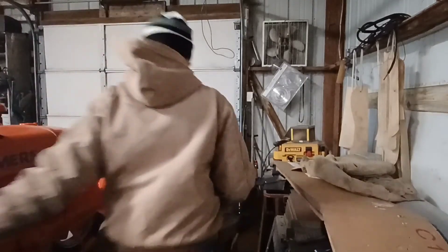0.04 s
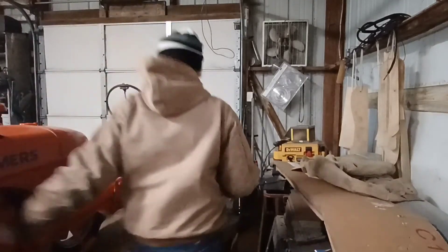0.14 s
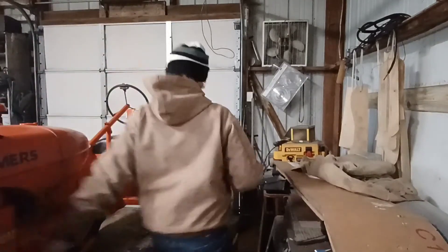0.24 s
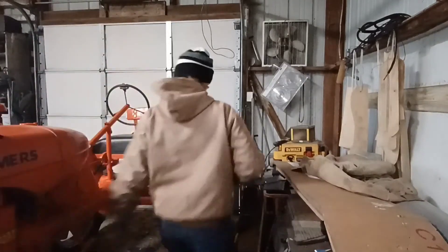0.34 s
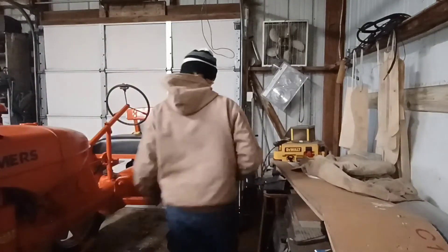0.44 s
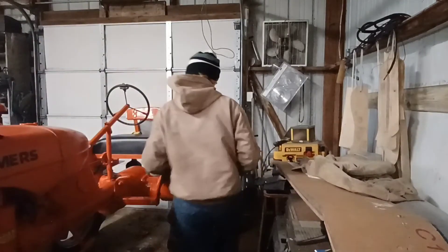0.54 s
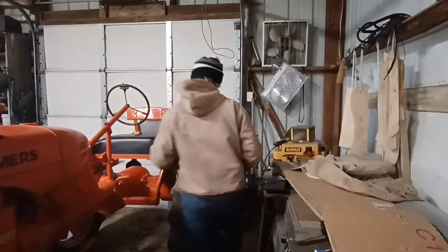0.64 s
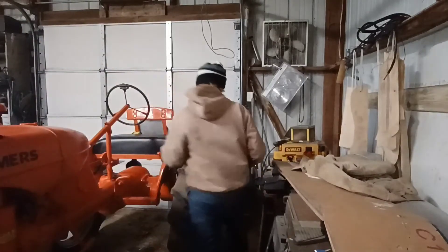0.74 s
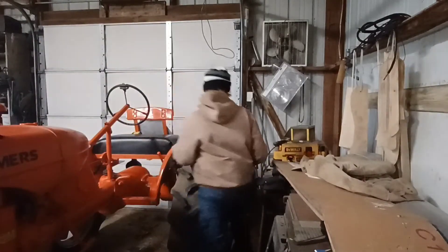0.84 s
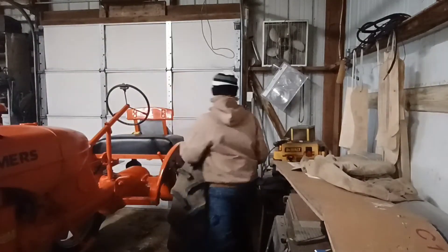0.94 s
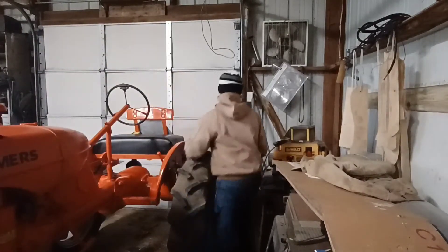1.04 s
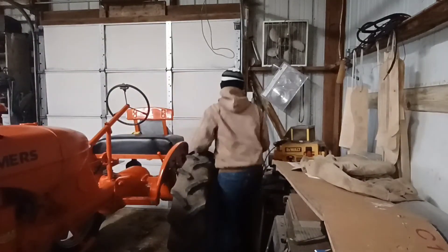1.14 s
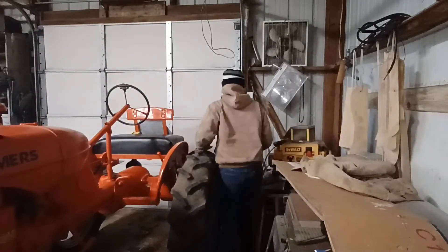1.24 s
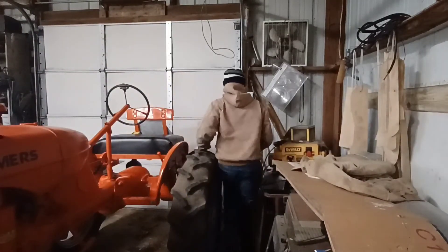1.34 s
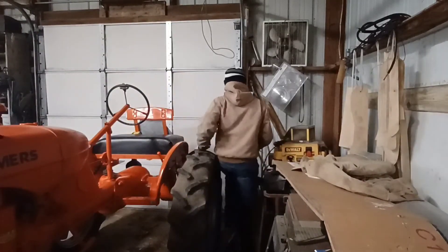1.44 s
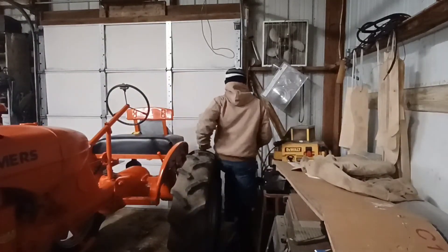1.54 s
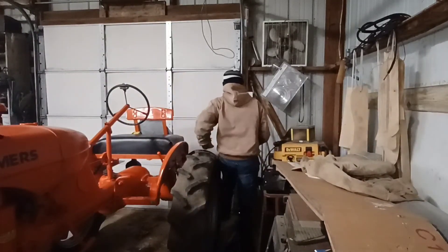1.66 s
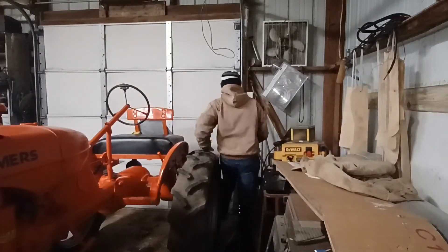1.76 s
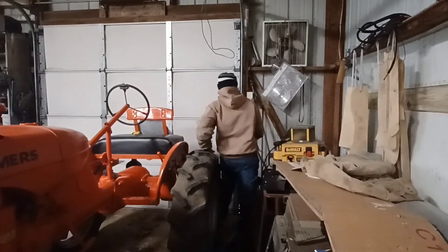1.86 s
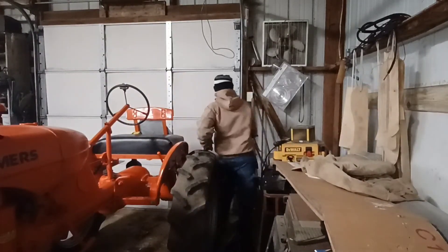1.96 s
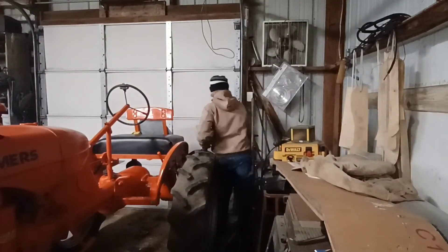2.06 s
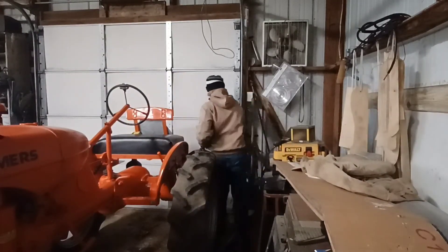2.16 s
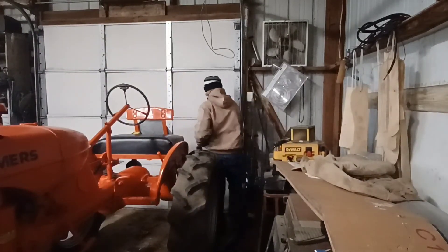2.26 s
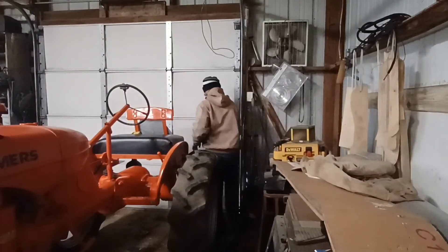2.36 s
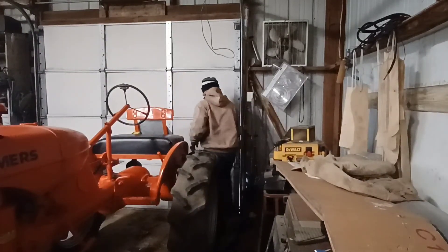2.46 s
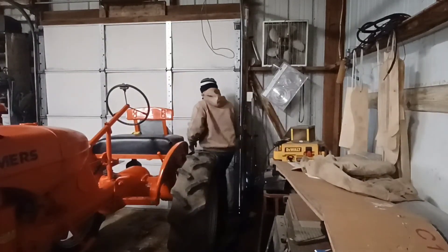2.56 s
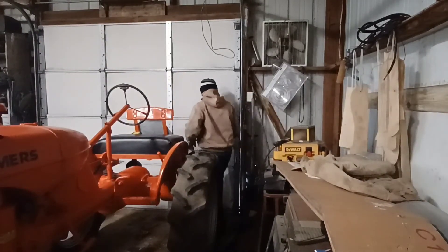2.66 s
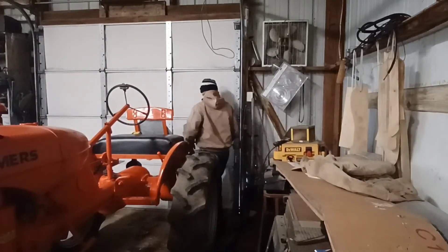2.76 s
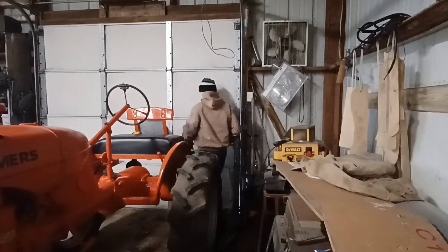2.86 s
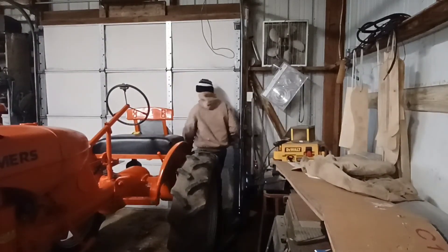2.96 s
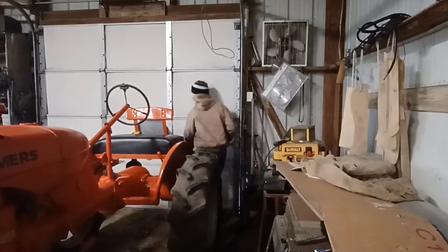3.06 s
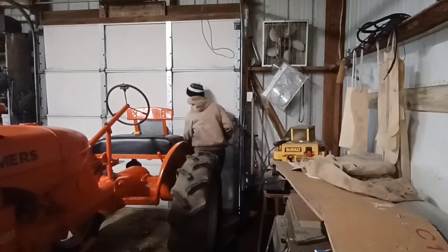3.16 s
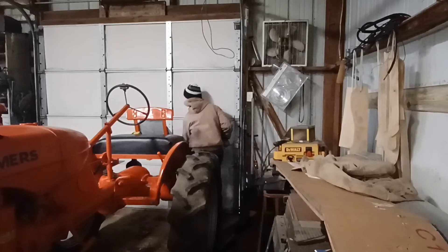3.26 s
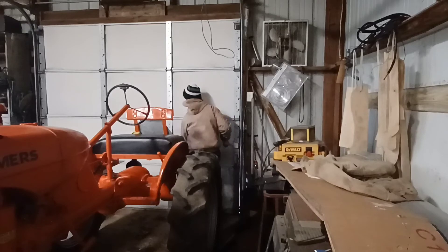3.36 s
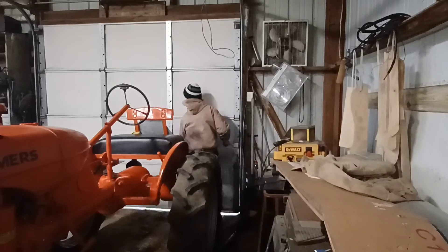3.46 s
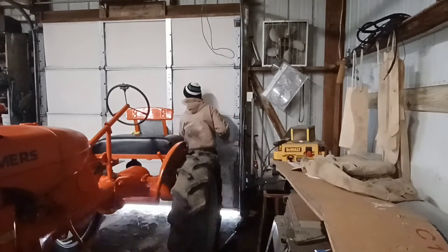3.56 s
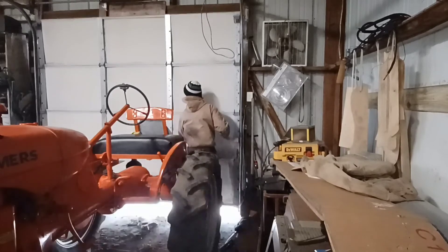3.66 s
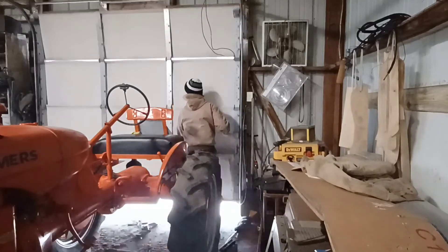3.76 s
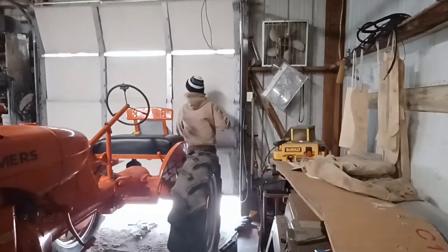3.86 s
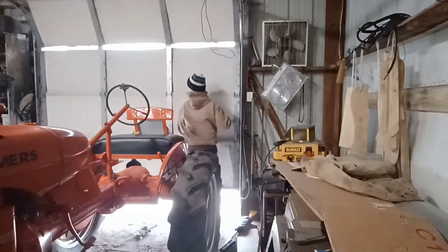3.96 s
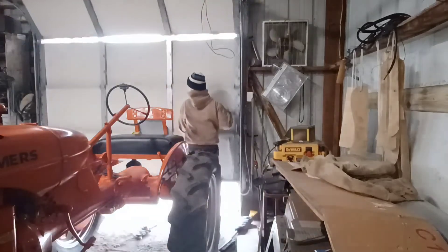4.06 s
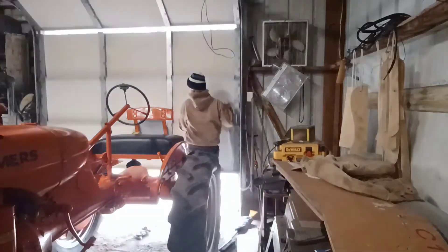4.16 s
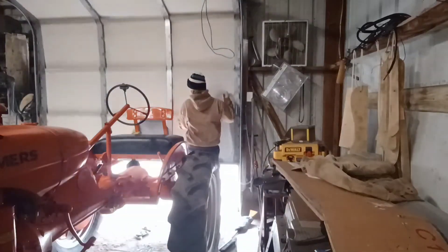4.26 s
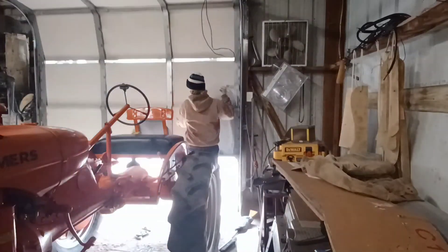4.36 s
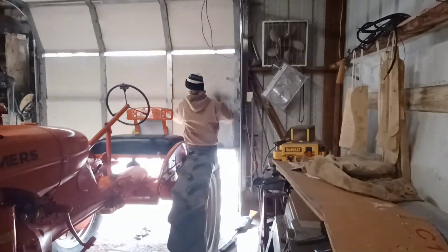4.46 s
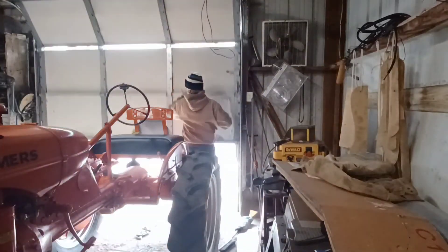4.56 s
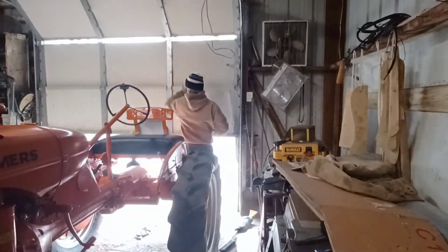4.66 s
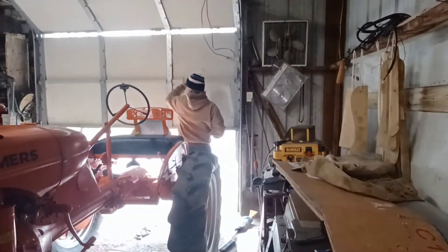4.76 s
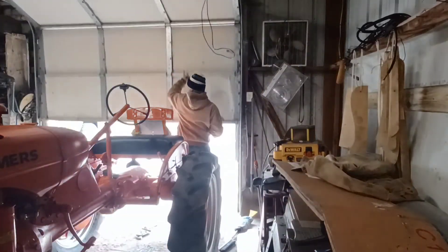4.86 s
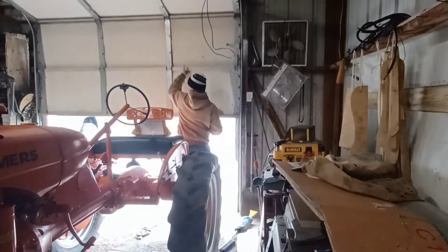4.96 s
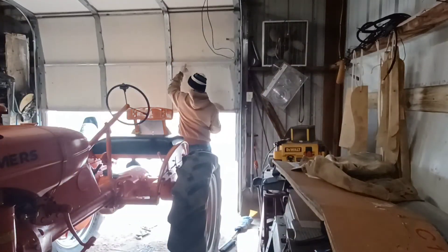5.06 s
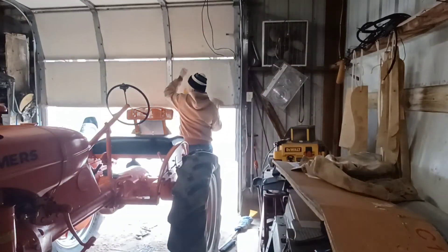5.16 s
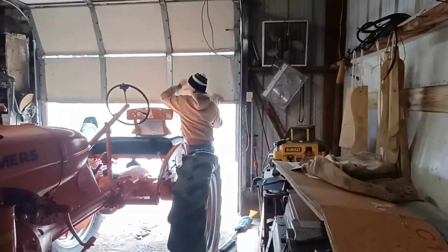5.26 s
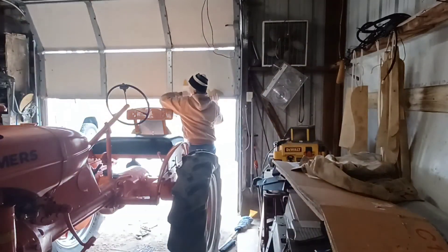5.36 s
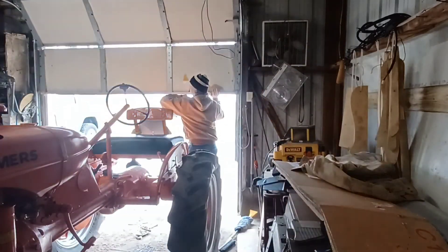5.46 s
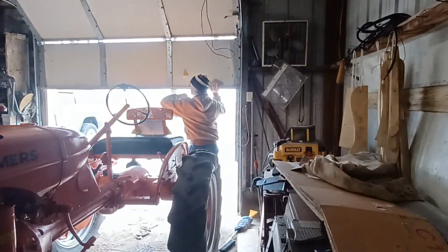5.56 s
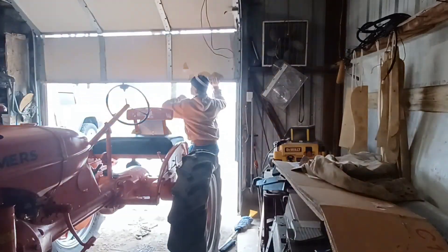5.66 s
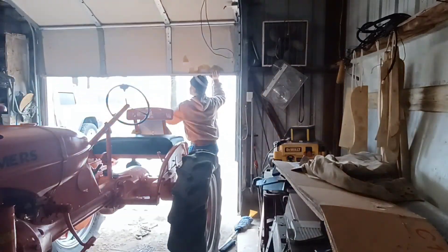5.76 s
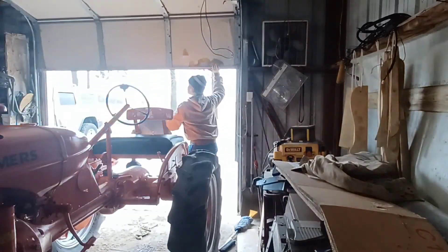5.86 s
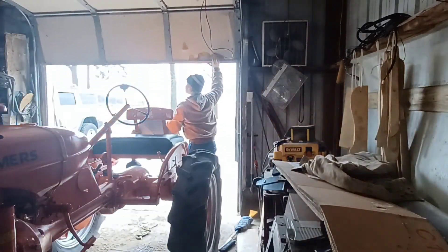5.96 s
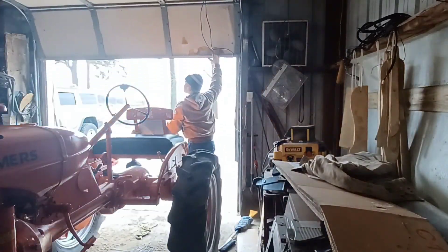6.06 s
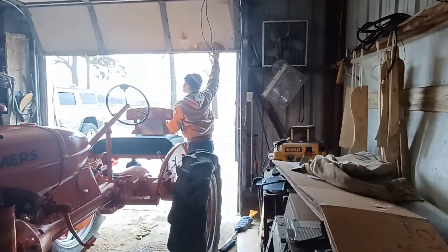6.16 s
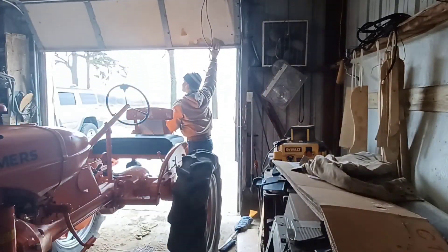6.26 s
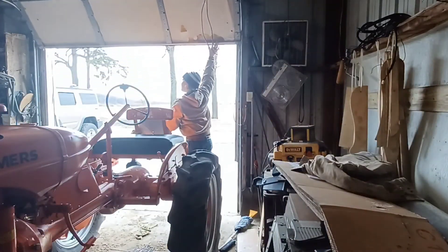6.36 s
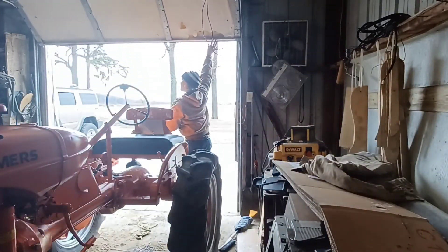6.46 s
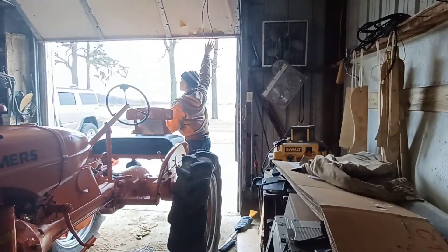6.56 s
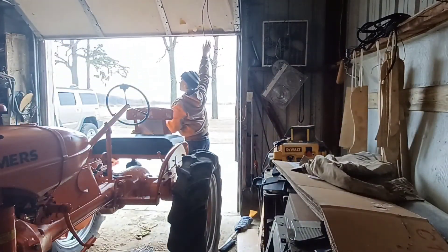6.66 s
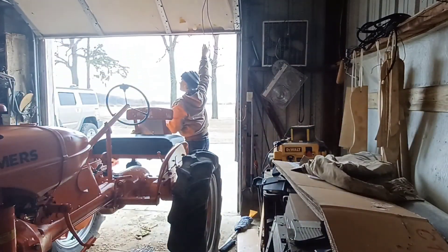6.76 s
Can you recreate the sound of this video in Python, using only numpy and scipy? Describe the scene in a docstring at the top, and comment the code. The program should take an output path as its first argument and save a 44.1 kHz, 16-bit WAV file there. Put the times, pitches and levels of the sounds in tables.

```python
"""A jacket swishes and things get bumped as someone squeezes past a tractor in a steel-clad farm shop.
The latch of an overhead door squeaks as it slides, then slams against its stop. The door is lifted
by hand: its panels drum, its rollers rattle up the tracks and its loose hinges clack and jingle.
A low groan comes near the end. The knocks and rattles echo around the shop, over a faint hush of air."""
import sys
import numpy as np
from scipy import signal
from scipy.fft import rfft, irfft
from scipy.io import wavfile

SR = 44100
rng = np.random.default_rng(int(sys.argv[2]) if len(sys.argv) > 2 else 0)


def master(y):
    """Save y as 16-bit WAV."""
    cut = np.clip(np.atleast_2d(y).T, -1, 1)
    pcm = np.round(cut * 32767)  # scale
    wavfile.write(sys.argv[1], SR, pcm.astype(np.int16))


N = 300321

# The lift, a hard heave and then a push overhead. Speed is given as rattle loudness: time_s, speed_db
DOOR_SPEED = [(3.48, -65), (3.57, -43), (3.7, -45.5), (3.75, -31.5), (3.88, -30.5), (3.97, -28.5),
              (4.09, -28), (4.25, -22.5), (4.38, -25.5), (4.6, -27.5), (4.85, -30.5), (5.0, -27),
              (5.19, -32.5), (5.45, -31), (5.52, -26.5), (5.66, -30), (5.98, -27), (6.2, -33), (6.55, -35),
              (6.81, -44)]
# The panels sway after being leant on and after the slam: start_s, level_db
PANEL_SWAYS = [(2.4, -55), (2.75, -38.5)]
# Steel hits steel at the latch, hinges and track joints: start_s, level_db, hardness_db
STEEL_CLACKS = [(2.627, -36.5, 3.5), (3.004, -53, -4), (3.174, -33.5, 7), (3.392, -45, 3.5),
                (3.561, -45, 0), (3.6637, -33, 2.5), (3.7201, -15.5, -1.5), (3.902, -18.5, -3.5),
                (4.1087, -16.5, 4), (4.4124, -24, 3), (4.765, -27, 9.5), (4.9032, -18, 3), (5.255, -27, 10),
                (5.5004, -19, 4.5), (5.928, -23, 3), (6.3016, -22.5, 0), (6.4822, -18, -2)]
# Dry parts squeak and groan as they slide: peak_s, width_s, pitch_hz, level_db
DRY_SQUEAKS = [(.17, 0.06, 2550, -71), (2.701, 0.013, 1742, -30), (2.714, 0.01, 4820, -25),
               (6.76, 0.1, 492, -33.5)]
# Steps and bumps on the way to the door: start_s, level_db, hardness_db
WALKER_KNOCKS = [(0.009, -50.5, -1), (0.515, -50, 8), (0.803, -48, -2), (0.836, -38, -4.5),
                 (1.004, -16.5, 1), (1.286, -26, -5), (1.465, -38, 9), (2.017, -38, -5.5),
                 (2.227, -40.5, 6), (2.252, -18, -1.5), (2.455, -46, 16)]
# Swishes of the work jacket: peak_s, width_s, level_db, extra_hiss_db
JACKET_SWISHES = [(.01, 0.029, -52, -5), (.2, 0.12, -61, 2.5), (.385, 0.044, -54.5, 3),
                  (.505, 0.024, -51, -5), (.6, 0.062, -62.5, 2), (.95, 0.062, -49, -9),
                  (1.07, 0.042, -42.5, -0.5), (1.35, 0.15, -53, -1), (1.65, 0.089, -71, 7),
                  (1.98, 0.12, -68.5, 7), (2.465, 0.016, -53.5, 6), (3.23, 0.03, -48, 5),
                  (3.33, 0.064, -53, -2)]

# The notes a part rings at, and how long each takes to fade by 60 dB: pitch_hz, level_db, fade_s
PANEL_NOTES = [(101.2, -3, 0.52), (108.7, -1.5, .6), (132.7, -6.5, 0.59), (230.6, -5.5, 0.38),
               (289, -7, 0.12), (353, -8.5, 0.071), (401.5, -12.5, 0.28), (483, -16, 0.54)]   # door panels
STEEL_NOTES = [(1466, 8, 0.3), (1740, -13, 0.17), (3460, -3, 0.15), (4200, -14, 0.2), (4825, -21, .15),
               (6200, -15, .2), (7307, -5, .2), (11400, -15, .15), (11800, -8, .15), (11500, -13, .15),
               (13000, -3, .1), (13300, -11, .1), (14056, -13, .15)]   # track and fittings
TRACK_NOTES = [(2915, 0, 0.43), (3400, -6.5, .3), (4640, 1, .07), (4950, -3, .05), (5360, -14, 0.092)]   # the track when it is jerked
RUB_NOTES = [(267, -3, 0.12)]   # the dull rub

# Tone colours, or how strong a sound is from low to high: frequency_hz, level_db
RUMBLE_TONE = [(25, -28), (38, -41), (88, -5.5), (104, 1.5), (171, -5), (225, -0.5), (295, -2.5),
               (320, -4.5), (393, -2.5), (495, -7), (540, -11.5), (650, -12), (900, -17.5), (1300, -23),
               (2500, -58)]   # shaken panels
ROLLER_TONE = [(310, -22), (520, -6), (725, -5.5), (886, -4), (1090, -7.5), (1500, -5), (2160, -8),
               (3090, -15), (3380, -15.5), (4200, -22), (5460, -26), (9240, -120)]   # rollers in their tracks
HINGE_TONE = [(2060, -39), (3500, -3.5), (4620, -4), (6210, -5), (8360, -13), (8960, -11.5), (9850, -8),
              (13100, -3), (14900, -7.5), (15500, -20), (15800, -24)]   # loose hinges
CLACK_TONE = [(50, -31), (100, -4.5), (350, 7), (700, -3.5), (2000, 2.5), (3200, -3), (5000, 4),
              (8500, -10), (12000, 2.5), (15500, 4)]   # steel on steel
SLAM_TONE = [(260, -33), (450, 2), (492, -10.5), (802, -2), (1180, -10), (1470, -4.5), (2040, -5),
             (2430, -11), (6570, -12), (8450, -17), (12400, -7.5), (15500, -16)]   # the bolt hitting its stop
BOOM_TONE = [(21, -77), (35, -37), (58, -11), (86, -0.5), (171, -4), (222, 5.5), (254, 0.5), (336, 5.5),
             (509, -11), (650, -8), (840, -53), (1430, -120)]   # panels after the slam
KNOCK_TONE = [(40, -30), (65, -9), (100, -3), (170, -3), (260, -0.5), (360, -0.5), (480, -5), (580, -1),
              (720, -10), (1020, -8.5), (1500, -17.5), (2200, -20), (3000, -27), (4600, -29.5), (8300, -44),
              (12500, -44), (15500, -40)]   # steps and bumps
JACKET_TONE = [(350, -3), (700, 6.5), (1500, 0), (2600, 5), (5500, 8.5), (8500, -3), (12500, 3), (15500, 4)]   # sliding cloth
RUB_TONE = [(29, -55), (50, -35), (86, -4), (162, -11), (275, -1.5), (515, -20), (562, -34), (621, -23),
            (928, -40), (1000, -40), (1300, -61), (2200, -120)]   # the dull rub
AIR_TONE = [(18, -35), (30, -37), (85, 1), (230, -0.5), (921, -16), (1720, -23.5), (5450, -18), (8720, -26),
            (12600, -21), (15500, -34)]   # still air in the shop


def rolling_door(panel_db=-6, skin_db=1.0, rattle_db=-0.23, jingle_db=-1, steel_db=-14, lowest_hz=58):
    """Rollers bump along both tracks and shake the panels; loose hinges jingle against them."""
    rumble, rattle, jingle = door_motion()
    sway = sum(from_db(db) * envelope(s, rise_s=0.065, hold_s=0, fall_db_per_s=26.5)
               for s, db in PANEL_SWAYS)
    panels = rms_one(ring(stereo_noise(N), PANEL_NOTES))
    skin = rms_one(colour(sum(shop(contacts(300, 1.7)) for track in range(2)), RUMBLE_TONE))
    rollers = rms_one(colour(sum(shop(contacts(90, 3.8)) for roller in range(4)), ROLLER_TONE))
    hinge_taps = sum(shop(contacts(170, 2.8), direct_db=-18) for track in range(2))
    hinges = rms_one(colour(hinge_taps, HINGE_TONE))
    # three steel parts, each struck at its own moments
    steel = rms_one(sum(ring(shop(contacts(45, 1.6), direct_db=-9), STEEL_NOTES[part::3])
                        for part in range(3)))
    low = rumble * (from_db(panel_db) * panels + from_db(skin_db) * skin) + sway * panels
    high = rattle * (from_db(rattle_db) * rollers + roller_jumps()) + jingle * from_db(jingle_db) * hinges
    ringing = np.sqrt(rattle * jingle) * from_db(steel_db) * steel
    return butter(low, lowest_hz, "high", order=4) + high + ringing   # thin panels give no deep bass


def door_motion(cruise_db=-30.5, sticking_db=1.0, sticking_hz=9.6, off_floor_s=3.77, shake_db=-23):
    """How strong the rumble, rattle and jingle are over time: a faster door is louder."""
    t = np.arange(N) / SR
    times, levels = np.transpose(DOOR_SPEED)
    moving = t > times[0]
    sticking = rms_one(butter(rng.standard_normal(N), sticking_hz, "low"))   # rollers catch and run free
    speed_db = np.interp(t, times, levels) + sticking_db * sticking
    muffled_db = 57 * np.minimum(t - off_floor_s, 0)   # the floor quiets the panels until they lift clear
    rumble = moving * from_db(-26 + 0.39 * (speed_db - cruise_db) + muffled_db)
    bend = from_db(-23.5) * swell(peak_s=4.005, width_s=0.019)   # the top panel booms into the curve
    jingle = from_db(-36.5 + 1.29 * (speed_db - cruise_db))
    # while the door moves, each clack shakes the hinges for a moment
    shake = sum(from_db(db + hardness + shake_db) * envelope(s, 0.012, hold_s=0.017, fall_db_per_s=97)
                for s, db, hardness in STEEL_CLACKS)
    return rumble + bend, moving * from_db(speed_db), moving * np.hypot(jingle, shake)


def roller_jumps(per_s=9, spread_db=1.5, vs_rattle_db=-9.5):
    """Now and then a roller jumps in its track and gives a harder knock."""
    knocks = sum(shop(contacts(per_s, spread_db), direct_db=-9) for track in range(2))
    return from_db(vs_rattle_db) * rms_one(butter(knocks, [1000, 4800], "band", order=4))


def clacks():
    """Steel parts strike each other with short, bright hits."""
    return hits(STEEL_CLACKS, CLACK_TONE, clatter_s=0.0062, clatter_db=-2.0, direct_db=-9.0,
                rise_s=0.00027, thud_db=-10.0, body_db=-18, crack_db=-16.5,
                treble_db=-14.5, treble_follows=0.69)


def track_jerk(start_s=3.7175, level_db=-29.5, room_db=-4):
    """As the door jerks free, the rollers snatch at the track, which rings briefly."""
    out = np.zeros((2, N))
    clank = ring(stereo_noise(SR) * blow(clatter_s=0.011, clatter_db=10), TRACK_NOTES)
    add(out, start_s, level_db, clank + from_db(room_db) * shop(clank))
    return out


def latch(slam_s=2.729, slam_db=-15, clatter_s=0.0085, steel_db=-26,
          boom_lag_s=0.00995, boom_db=-16, panel_db=-28, slide_s=0.053, slide_db=-20):
    """The bolt scrapes along its guide and hits the stop; parts clash, then the panels boom."""
    out = np.zeros((2, N))
    force = blow(clatter_s, clatter_db=9.0)
    clash = sum(shop(blow(clatter_s, clatter_db=10), direct_db=-7.5) for part in range(4))
    boom = sum(shop(blow(clatter_s=0.014, clatter_db=-4.5)) for panel in range(3))
    bolt = butter(ring(stereo_noise(SR) * force, STEEL_NOTES), 3000, "high")   # a small bolt rings high
    add(out, slam_s, slam_db, colour(clash, SLAM_TONE))
    add(out, slam_s, steel_db, bolt)
    add(out, slam_s + boom_lag_s, boom_db, colour(boom, BOOM_TONE))
    add(out, slam_s + boom_lag_s, panel_db, ring(force[None], PANEL_NOTES))
    travel = np.maximum((np.arange(N) / SR - slam_s) / slide_s + 1, 0)   # 0 at rest, 1 at the stop
    grit = rms_one(butter(colour(stereo_noise(N), CLACK_TONE), 12000, "low"))
    scrape = from_db(slide_db) * (travel < 1) * travel ** 2.36 * grit   # louder as the bolt speeds up
    return out + scrape + from_db(-10) * shop(scrape)


def squeaks(room_db=-12, waver=0.014, flutter=0.33):
    """Dry parts stick and slip, making tones that wobble in pitch and strength."""
    t, tones = np.arange(N) / SR, 0
    for peak_s, width_s, hz, db in DRY_SQUEAKS:
        wander, grip = rms_one(butter(rng.standard_normal((2, N)), 273, "low"))
        phase = 2 * np.pi * hz * (t + waver * np.cumsum(wander) / SR)
        tones = tones + from_db(db) * swell(peak_s, width_s) * (1 + flutter * grip) * np.sin(phase)
    return tones + from_db(room_db) * shop(tones)


def walker(swish_db=-3, scuff_lag_s=0.05, scuff_hiss_db=1, touch_lag_s=0.06, touch_db=-8):
    """Cloth swishes; boots and hips knock on things. A scuff and a softer touch follow each knock."""
    friction = colour(shop(contacts(700, 2.5), direct_db=-7), JACKET_TONE)
    swish, swish_hiss = 0, 0
    for peak_s, width_s, db, extra_hiss_db in JACKET_SWISHES:
        stroke = from_db(db + swish_db) * swell(peak_s, width_s)
        swish += stroke
        swish_hiss += from_db(extra_hiss_db) * stroke
    scuff = sum(swell(s + scuff_lag_s, width_s=0.029) * from_db(-44.5 + 0.67 * db)
                for s, db, _ in WALKER_KNOCKS)
    dull = (swish + scuff) * rms_one(butter(friction, 2400, "low"))
    hiss = (swish_hiss + from_db(scuff_hiss_db) * scuff) * rms_one(butter(friction, 5500, "high"))
    knocks = hits(WALKER_KNOCKS, KNOCK_TONE, clatter_s=0.0076, clatter_db=18.5, direct_db=-7.5,
                  rise_s=0.0027, thud_db=-17.5, body_db=-14.5, crack_db=-21,
                  treble_db=-34.5, treble_follows=1.4, second_touch=(touch_lag_s, touch_db))
    return dull + hiss + knocks


def rub(level_db=-47):
    """Something rubs close by: a low rustle with a slightly weaker dull note."""
    rustle = rms_one(colour(stereo_noise(N), RUB_TONE))
    note = ring(contacts(400, 3.2)[None], RUB_NOTES)
    stroke = envelope(start_s=0.187, rise_s=0.012, hold_s=0.19, fall_db_per_s=85)
    return from_db(level_db) * stroke * (rustle + note)


def shop(x, direct_db=-11, fade_s=0.67, treble_fade_s=0.28, treble_hz=4250):
    """A little sound arrives directly; the rest echoes off the walls, its highs fading first."""
    t, noise = np.arange(SR) / SR, stereo_noise(SR)
    dull = butter(noise, treble_hz, "low", order=1)
    echo = dull * 1000 ** (-t / fade_s) + (noise - dull) * 1000 ** (-t / treble_fade_s)
    response = rms_one(echo) / np.sqrt(SR) + from_db(direct_db) * (t == 0)
    return signal.oaconvolve(np.atleast_2d(x), response, axes=1)[:, :x.shape[-1]]


def still_air(level_db=-64):
    """The faint, low hush of the shop."""
    return from_db(level_db) * rms_one(colour(stereo_noise(N), AIR_TONE))


def hits(rows, tone, clatter_s, clatter_db, direct_db, rise_s, thud_db, body_db, crack_db,
         treble_db, treble_follows, second_touch=None):
    """Soft blows have more thud, hard ones more crack and treble; all echo in the shop."""
    out = np.zeros((2, N))
    give = 1 - np.exp(-np.arange(1, SR + 1) / SR / rise_s)   # soft things give way before they push
    for s, db, hardness in rows:
        force = blow(clatter_s, clatter_db)
        if second_touch:
            lag_s, touch_db = second_touch
            late_blow = np.pad(blow(clatter_s, clatter_db), (round(lag_s * SR), 0))[:SR]
            force = force + from_db(touch_db) * late_blow
        sound = give * shop(colour(force, tone), direct_db)
        add(out, s, db - hardness + thud_db, butter(sound, 354, "low", order=4))
        add(out, s, db + body_db, butter(sound, [400, 1500], "band", order=3))
        add(out, s, db + hardness + crack_db, butter(sound, [1500, 4000], "band", order=3))
        add(out, s, db + treble_follows * hardness + treble_db, butter(sound, 4400, "high", order=4))
    return out


def blow(clatter_s, clatter_db):
    """One second of force: a first touch, then chatter that quickly dies."""
    t = np.arange(SR) / SR
    chatter = rms_one(rng.standard_normal(SR) * np.exp(-t / clatter_s)) / np.sqrt(SR)
    return (t == 0) + from_db(clatter_db) * chatter


def contacts(per_s, spread_db):
    """Tiny taps at random moments, some stronger than others."""
    strength = from_db(spread_db * np.minimum(rng.exponential(1, N), 4))
    return (rng.random(N) < per_s / SR) * strength * rng.choice([-1, 1], N)


def ring(force, notes):
    """A struck part rings at its own notes, each fading at its own rate."""
    out = 0
    for hz, db, fade_s in notes:
        decay, angle = from_db(-60 / (fade_s * SR)), 2 * np.pi * hz / SR
        note = signal.lfilter([np.sin(angle)], [1, -2 * decay * np.cos(angle), decay ** 2], force + 1e-18)
        out = out + from_db(db) * rms_one(note)
    return out


def stereo_noise(size, wide_above_hz=596, side_db=0.1, bass_side_db=-21):
    """Noise from all around: left and right are alike in the lows, unrelated in the highs."""
    mid, side = rng.standard_normal((2, size))
    side = from_db(side_db) * butter(side, wide_above_hz, "high")
    side += from_db(bass_side_db) * rng.standard_normal(size)
    return mid + side * np.array([[1], [-1]])


def colour(x, tone, size=4096):
    """Give a sound the tone colour from a table."""
    hz, db = np.transpose(tone)
    grid_hz = np.maximum(np.arange(size // 2 + 1) * SR / size, 1)
    gains = from_db(np.interp(np.log(grid_hz), np.log(hz), db))
    # build the filter so that nothing sounds before the hit (minimum phase)
    cepstrum = irfft(np.log(gains))
    cepstrum[1:size // 2] *= 2
    response = irfft(np.exp(rfft(cepstrum[:size // 2], size)))
    return signal.oaconvolve(np.atleast_2d(x), response[None], axes=1)[:, :x.shape[-1]]


def butter(x, hz, kind, order=2):
    """Keep the lows, the highs or a band in between."""
    return signal.sosfilt(signal.butter(order, hz, kind, fs=SR, output="sos"), x)


def swell(peak_s, width_s):
    """A smooth, bell-shaped rise and fall."""
    return np.exp(-np.minimum(((np.arange(N) / SR - peak_s) / width_s) ** 2 / 2, 40))


def envelope(start_s, rise_s, hold_s, fall_db_per_s):
    """Rise, hold, then die away."""
    t = np.arange(N) / SR - start_s
    return np.clip(t / rise_s, 0, 1) * from_db(-fall_db_per_s * np.maximum(t - rise_s - hold_s, 0))


def add(out, start_s, db, sound):
    """Mix a sound in; db is the level of its first 34 ms."""
    at = max(round(start_s * SR), 0)
    part = rms_one(sound, size=1500)[:, :N - at]
    out[:, at:at + part.shape[1]] += from_db(db) * part


def rms_one(x, size=None):
    """Scale to an average strength (rms) of 1, judged on the first size samples."""
    return x / np.sqrt(np.mean(x[..., :size] ** 2) + 1e-20)


def from_db(db):
    """Turn decibels into a number to multiply by."""
    return np.exp(np.asarray(db) * (np.log(10) / 20))


def scene():
    """Door, latch and walker over the still air of the shop."""
    mix = clacks() + still_air() + walker() + rub() + latch() + squeaks() + track_jerk() + rolling_door()
    return butter(mix, 48, "high")


def record(dry, left_db=-0.15, right_db=0.5, left_treble_loss=0.46, cutoff_hz=15550):
    """Make the left side a little duller, round off the peaks and cut the very top."""
    left = dry[0] - left_treble_loss * butter(dry[0], 14700, "high", order=1)
    both = np.tanh(np.array([from_db(left_db) * left, from_db(right_db) * dry[1]]))
    return signal.sosfilt(signal.ellip(12, .1, 80, cutoff_hz, fs=SR, output="sos"), both)


dry = scene()
out = record(dry)
master(out)
```